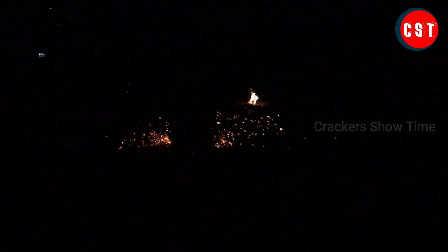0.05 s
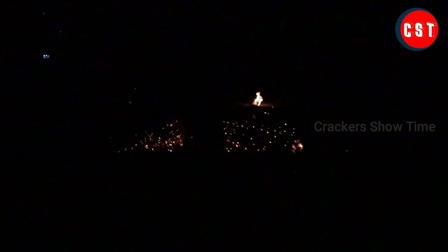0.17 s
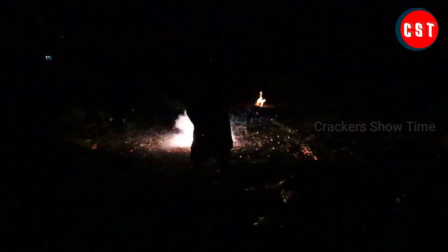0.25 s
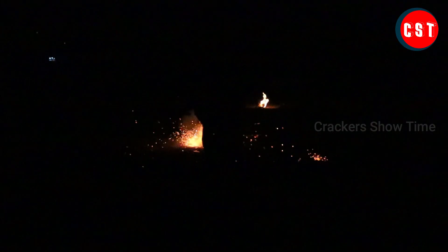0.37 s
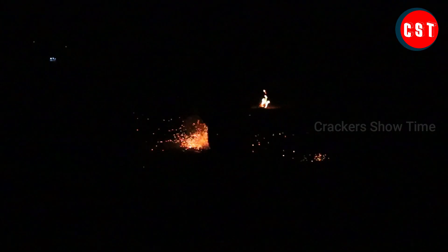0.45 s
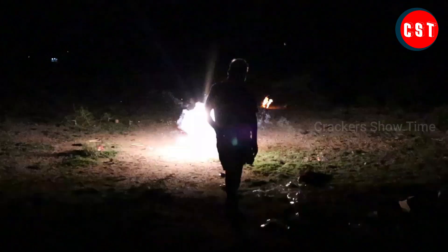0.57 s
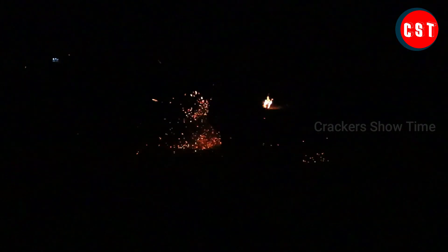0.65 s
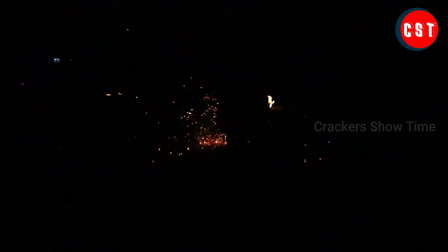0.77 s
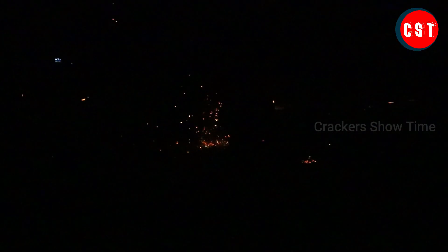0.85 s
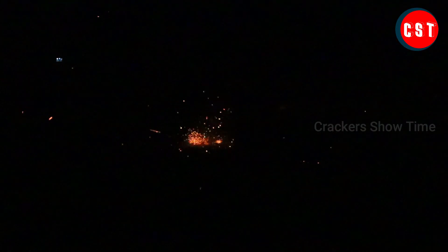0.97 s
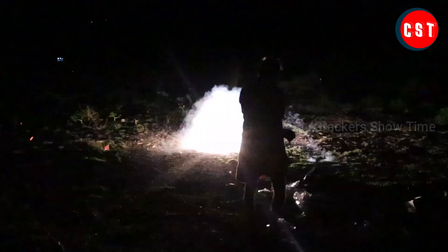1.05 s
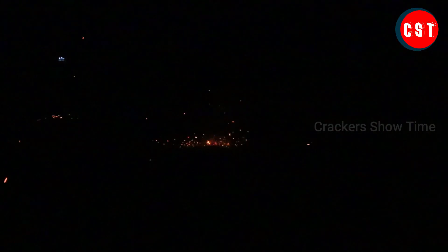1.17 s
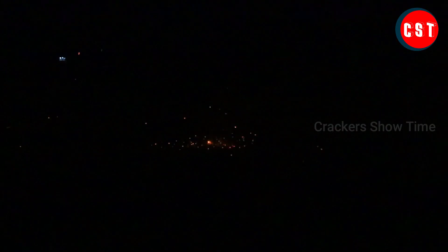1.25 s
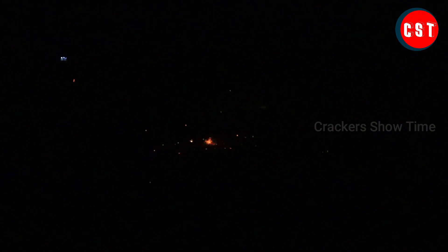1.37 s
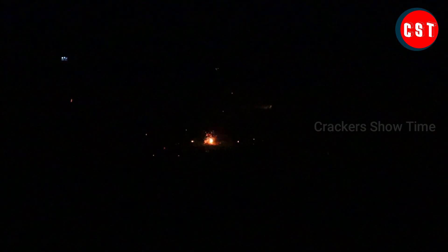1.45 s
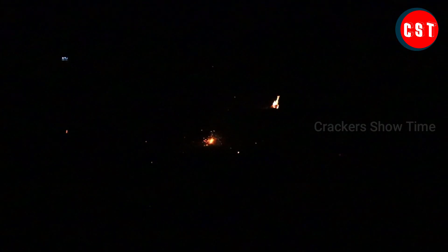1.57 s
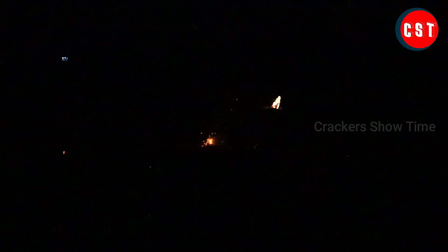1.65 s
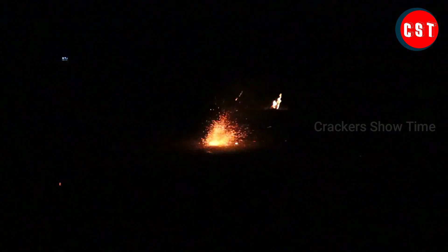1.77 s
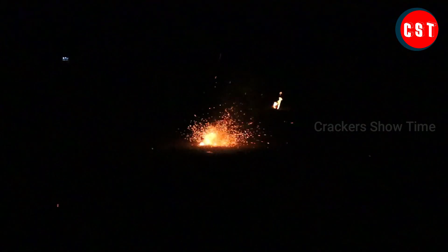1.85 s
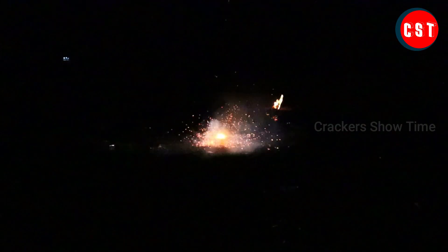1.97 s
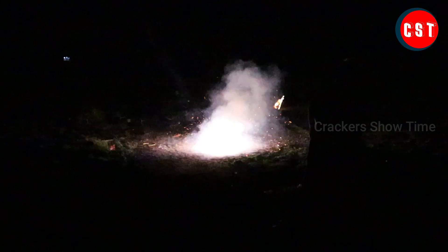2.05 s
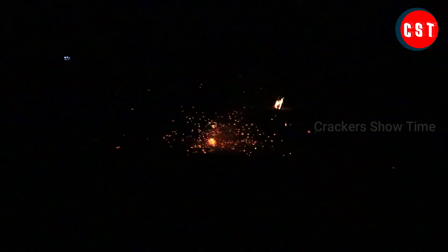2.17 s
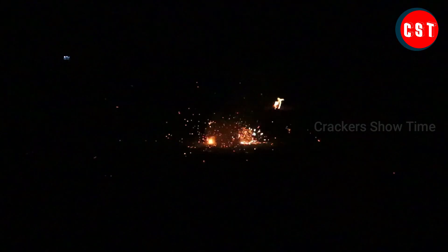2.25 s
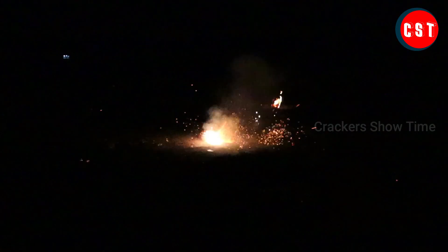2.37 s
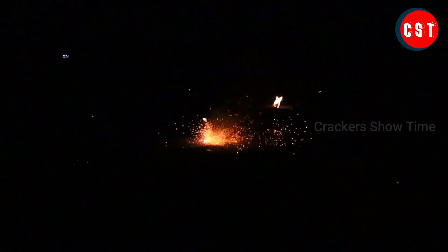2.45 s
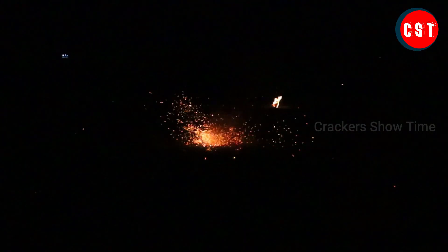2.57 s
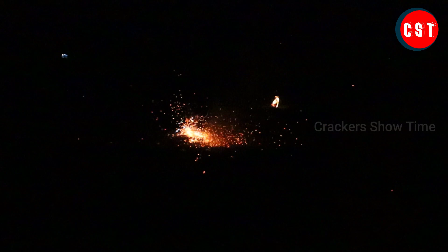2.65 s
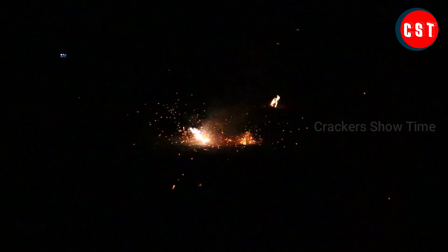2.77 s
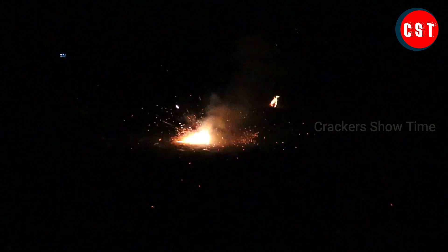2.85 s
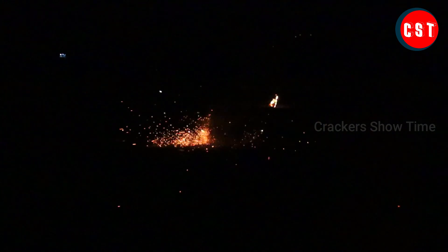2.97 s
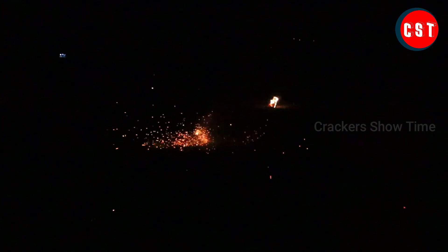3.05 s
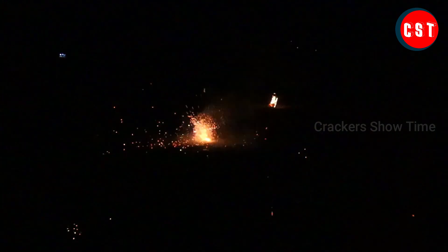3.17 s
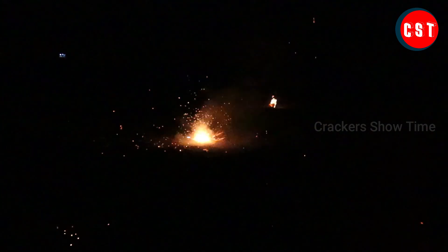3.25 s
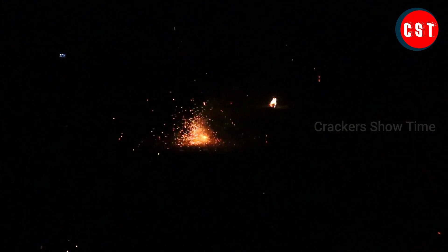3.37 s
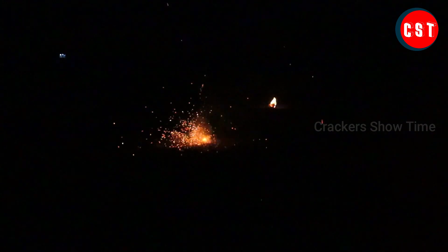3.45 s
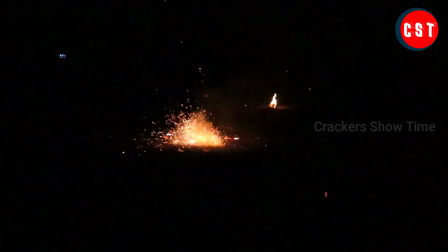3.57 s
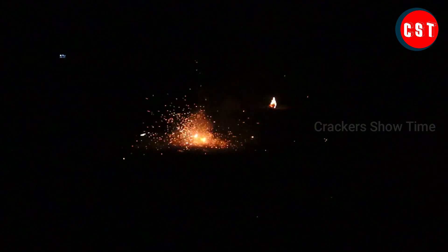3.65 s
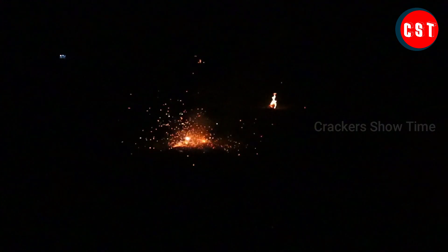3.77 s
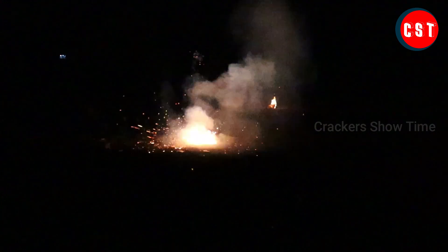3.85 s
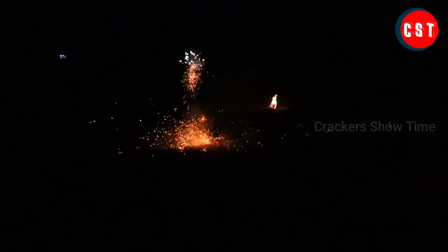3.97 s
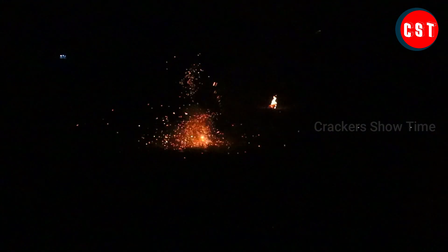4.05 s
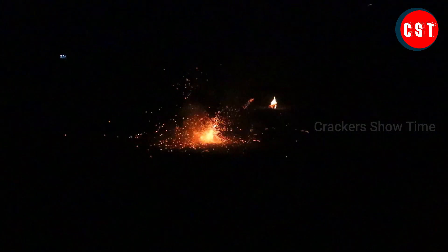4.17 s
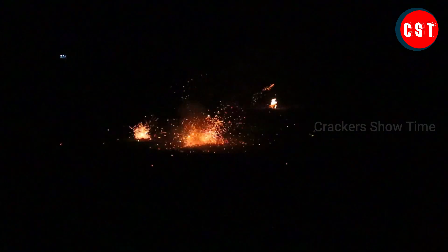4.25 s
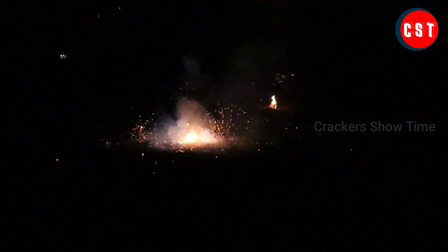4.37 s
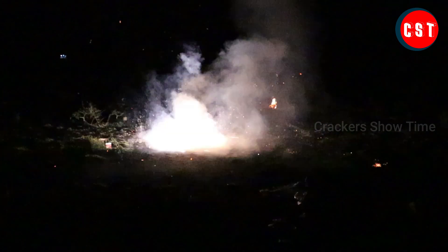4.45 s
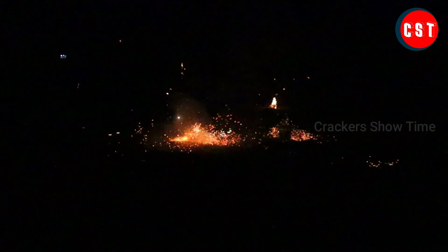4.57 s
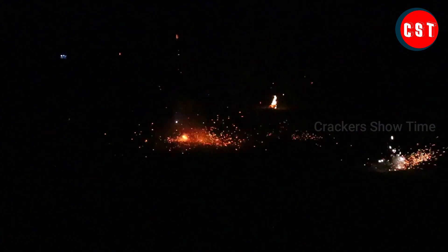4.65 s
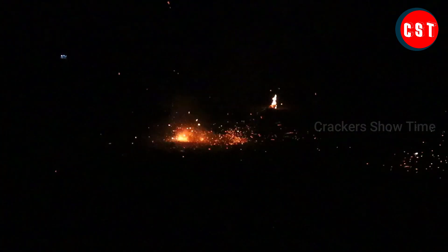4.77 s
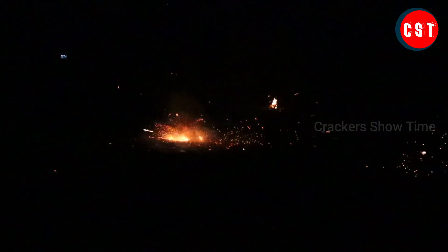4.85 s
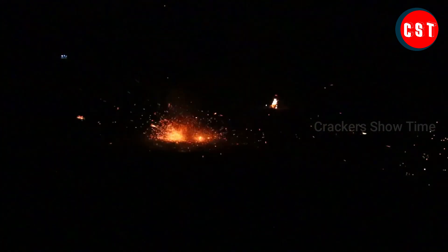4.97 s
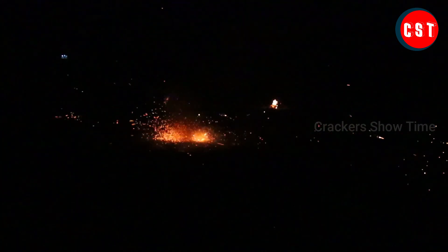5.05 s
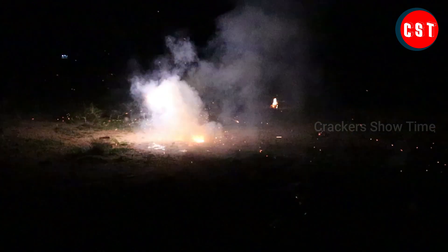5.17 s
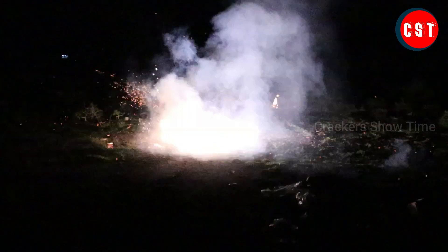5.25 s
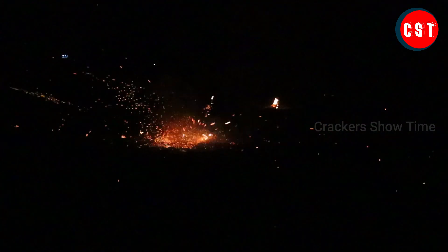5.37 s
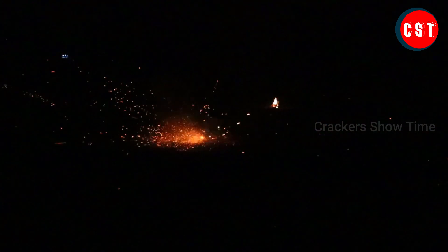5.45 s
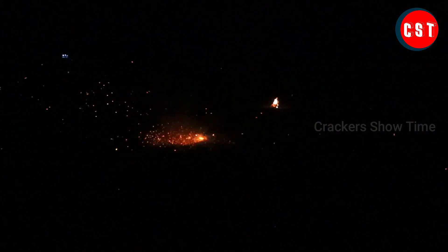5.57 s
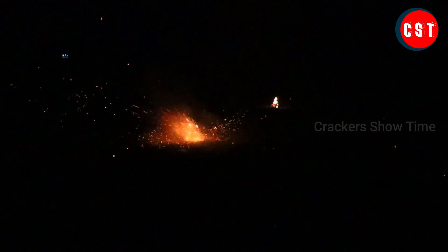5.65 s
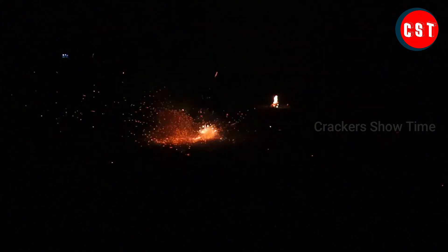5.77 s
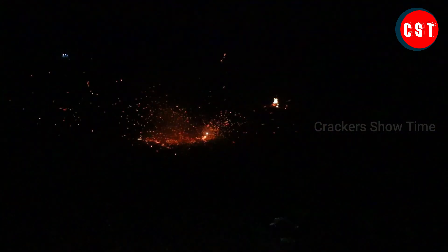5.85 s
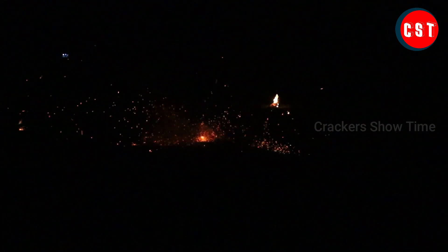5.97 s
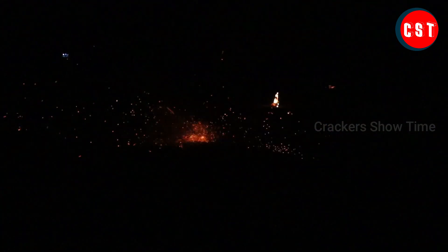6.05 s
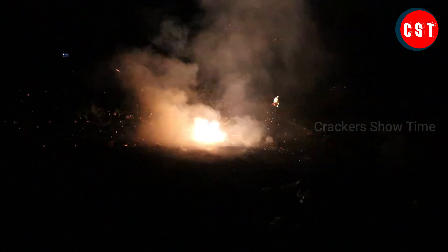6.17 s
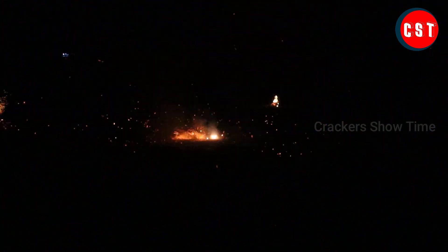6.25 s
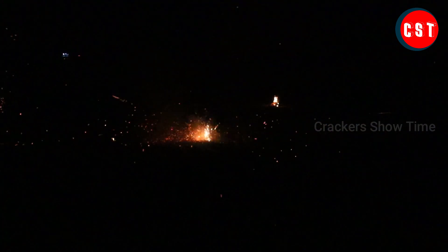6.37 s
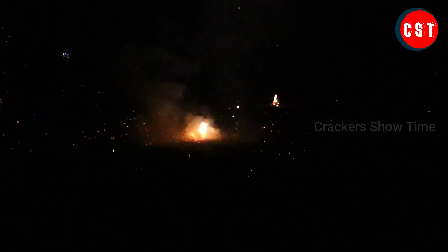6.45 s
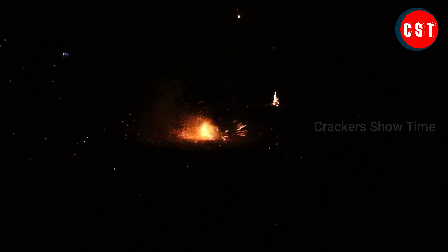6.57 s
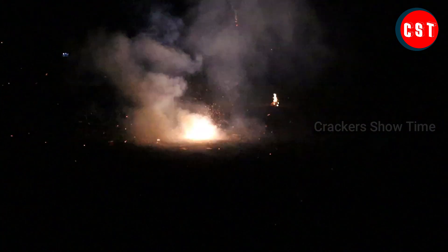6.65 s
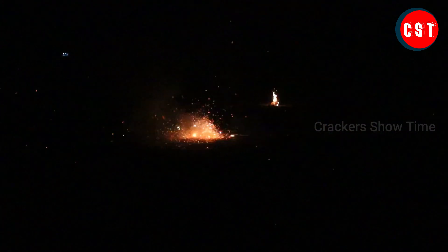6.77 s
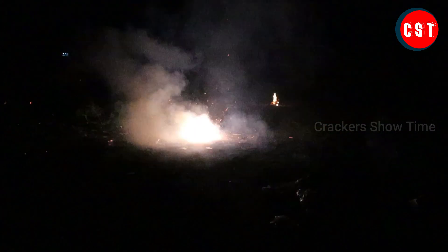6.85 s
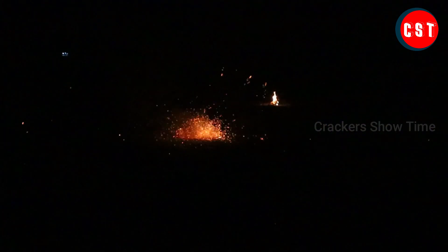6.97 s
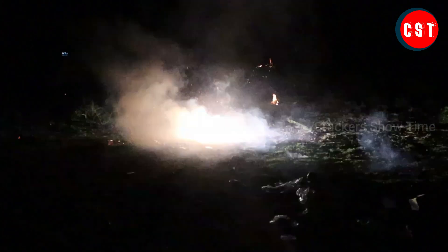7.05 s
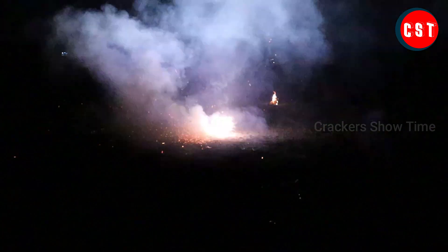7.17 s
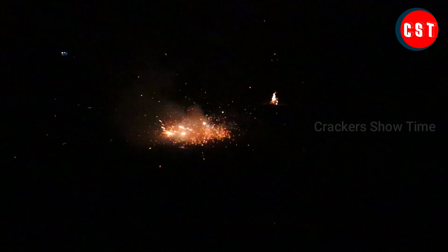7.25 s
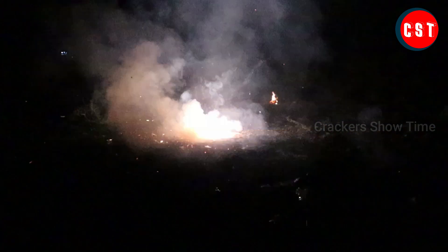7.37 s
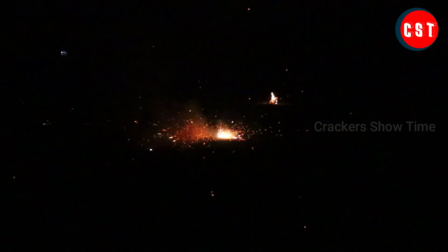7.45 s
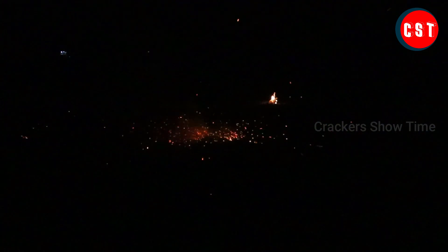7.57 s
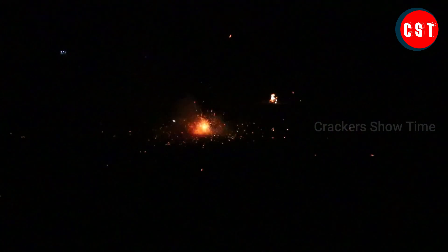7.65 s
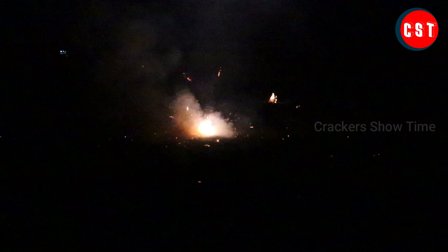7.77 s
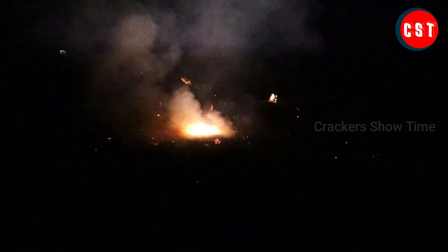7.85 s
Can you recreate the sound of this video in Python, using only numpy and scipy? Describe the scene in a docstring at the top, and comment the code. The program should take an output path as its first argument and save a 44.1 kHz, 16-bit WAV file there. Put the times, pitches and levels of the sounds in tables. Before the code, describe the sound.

At night on open ground, a firecracker string explodes a few metres from a hand-held stereo recorder. Echo from earlier blasts already hangs at the start. From 0.1 to 0.55 seconds come the most violent bangs, clipped cracks with thick low thumps, the hardest near 0.44. Four more spaced bangs follow between 0.75 and 1.24. The wash then fades through a pause until about 1.88, with faint, very high cricket chirps around 1.6 to 1.85. Bangs return, clustering at 2.4 to 3.0, then loosen, with lighter snaps near 3.7. From 4 seconds the chain grows dense and irregular, several to over ten pops a second, brighter, drier and with little bass, crowding most around 5.4 and 7.0 to 7.3. Slaps and wide noisy reverberation fill the gaps, ducked by overload after big blasts. It thins slightly near 7.6 but continues to the end, near 7.9.

```python
"""Firecracker string at night

A string of firecrackers burns on open ground, a few metres from a hand-held stereo recorder.
Each bang is an N-shaped shock with a ground bounce, a spit of bright noise and a thump of ringing low modes.
Walls and trees send back slaps and a long wash, built from bursts and bands of dying noise.
The bangs overload the recorder, whose limiter ducks the wash after each one; crickets chirp in a pause."""
import sys
import numpy as np
from scipy import signal
from scipy.fft import rfft, irfft
from scipy.io import wavfile
from scipy.ndimage import minimum_filter1d

SR = 44100
rng = np.random.default_rng(int(sys.argv[2]) if len(sys.argv) > 2 else 0)


def wav_record(signal):
    """Record a signal, one row per channel, as 16-bit PCM in the file named by sys.argv[1]."""
    frames = np.transpose(np.atleast_2d(signal))
    bounded = np.clip(frames, -1, 1)
    # unit amplitude maps onto the largest positive 16-bit level
    quanta = np.round(bounded * 32767).astype(np.int16)
    wavfile.write(sys.argv[1], SR, quanta)


N = 348831

# The bangs of the string. Each row: start in seconds, relative blast sent to the surroundings in dB,
# relative crack straight to the recorder in dB, relative thump in dB, ground bounce delay in ms,
# shock length in ms.
BANG_ROWS = [(0.0952, 19, 19, 11, 0.43, 0.3), (0.1397, 6.5, 17.0, 11, 0.47, 0.29),
             (0.3758, 14.5, 15, 9.5, 0.34, 0.26), (0.4358, 20.5, 29, 15.5, 0.35, 0.3),
             (0.4528, 18.5, 17.5, 15.5, 0.71, 0.3), (0.5286, 23, 21, 10.5, 0.14, 0.35),
             (0.7463, 4, 8.5, 1, 0.62, 0.28), (0.8579, 18.5, 10.5, 11.5, 0.58, 0.3),
             (1.1063, 11, 7, 3.5, 0.37, 0.46), (1.2361, 18.5, 12, 13, 0.88, 0.18),
             (1.878, 4.5, 6, 7, 0.16, 0.27), (1.9672, 12.0, 10.0, 6.5, 1.07, 0.42),
             (2.1606, 0, -1.5, -4, 1.9, 0.46), (2.229, 15, 12, 2, 0.56, 0.23),
             (2.3815, 9.5, 6.5, 3, 0.42, 0.29), (2.4784, 3.5, 10.5, -1, 0.3, 0.12),
             (2.4799, 3, 13.5, -8, 0.18, 0.19), (2.4847, -8, 7, -5.5, 1.2, 0.42),
             (2.5393, 4.5, 7, 3.5, 0.72, 0.34), (2.6467, 10.5, 3, 0.5, 0.36, 0.3),
             (2.6577, 9, 10, 2, 0.37, 0.29), (2.6689, 5, 4.5, -1, 0.4, 0.21),
             (2.8054, 14.5, 11.5, 2.0, 0.31, 0.31), (2.8163, 10, 6.5, 0.5, 0.7, 0.28),
             (2.9146, 7.5, 4.5, -4.5, 0.35, 0.29), (2.9983, 5.5, 2.5, -1, 0.62, 0.26),
             (3.0209, -18, 5, -3, 0.29, 0.21), (3.2761, 8.5, 3.5, -10, 0.32, 0.32),
             (3.4144, 1, 4.0, -2, 0.68, 0.28), (3.5685, 3, 2, -7.5, 0.49, 0.26),
             (3.6697, -49, -11.5, -21.0, 0.33, 0.33), (3.711, -44, -5, -5, 0.69, 0.3),
             (3.7191, -22.0, 4, -6, 1.39, 0.34), (3.9713, -8.5, 0, -8, 0.36, 0.23),
             (3.9906, 4.5, 6.0, -2.5, 0.63, 0.28), (4.0278, 5.5, -2.5, 1.5, 0.53, 0.27),
             (4.0962, 2, 1, -5.5, 0.62, 0.32), (4.1842, 2.0, 1.0, -18, 0.34, 0.3),
             (4.2466, 1.0, -2.5, -13, 0.66, 0.32), (4.3975, -0.5, -2.5, -19, 0.41, 0.3),
             (4.4123, -13.0, -8.5, -31, 0.27, 0.7), (4.4924, -19, -6, -12.5, 0.33, 0.3),
             (4.5769, -4.0, -1.5, -18.5, 0.62, 0.3), (4.6332, -4.5, -4, -9.5, 0.67, 0.34),
             (4.6683, -5.5, -1, -13.0, 0.48, 0.28), (4.6841, 4, 0, -4, 0.32, 0.36),
             (4.7359, -11, -0.5, -8, 0.36, 0.34), (4.7823, -10, 3.0, -7.5, 0.3, 0.19),
             (4.8715, -7, -7, -15, 0.37, 0.33), (4.8801, -12.5, -11, -9.5, 0.98, 0.36),
             (5.0003, -11, -5.5, -8, 0.37, 0.31), (5.068, -3.5, -5.5, -10.5, 0.56, 0.25),
             (5.0701, -6, -5, -10.5, 0.66, 0.33), (5.1063, 0.5, -4, -4.5, 0.26, 0.22),
             (5.2109, -13, -9, -7.5, 0.79, 0.45), (5.2556, -6, -3, -3.5, 0.24, 0.29),
             (5.2763, -4.5, -1.5, -5, 0.38, 0.27), (5.3507, -11, -4, -15.5, 0.71, 0.22),
             (5.398, -13, -9, -13.5, 1.14, 0.36), (5.4131, -19, -13.5, -21.0, 0.75, 0.26),
             (5.4212, -8, -3.5, -4.5, 0.3, 0.43), (5.4317, -7.5, -5, -16.5, 0.38, 0.26),
             (5.5012, -15, -3.5, -10.0, 0.27, 0.35), (5.5025, -17, -2, -14, 0.7, 0.34),
             (5.507, -13.0, -4.5, -12, 0.42, 0.23), (5.57, -19, -5.5, -5.5, 0.7, 0.33),
             (5.7704, -5, -3.5, -10.5, 0.68, 0.31), (5.7918, -17, -20.5, -19.5, 0.22, 0.45),
             (5.8624, -2.5, -7.0, -12, 0.49, 0.27), (5.9084, -8.0, -5, -19, 0.4, 0.35),
             (5.937, -18, -10.5, -16.5, 0.67, 0.32), (6.0441, -5.0, 1, -8.5, 0.36, 0.36),
             (6.0527, -27.0, -4, -16, 0.75, 0.32), (6.1941, -5.5, -0.5, -12, 0.37, 0.24),
             (6.398, -14, -7.5, -15.5, 0.74, 0.23), (6.4094, -15, -7, -49, 0.56, 0.52),
             (6.4453, -6, -1.0, -7.0, 0.72, 0.27), (6.5243, -10.5, -6.5, -18, 0.39, 0.3),
             (6.6241, -14, -8, -13, 0.36, 0.32), (6.7237, -13.5, -3.5, -8.0, 0.62, 0.37),
             (6.8273, 2, 1, -19, 0.5, 0.3), (6.9106, -10, -0.5, -8.5, 0.28, 0.35),
             (6.9265, -3.5, -0.5, -11.0, 0.4, 0.31), (6.9779, -2.5, 0.5, -8, 0.35, 0.32),
             (7.0165, 0.5, -1, -10.5, 0.47, 0.3), (7.0335, -6, -2, -18, 0.32, 0.26),
             (7.0428, -9, 3.5, -5.5, 0.3, 0.29), (7.1683, -2, -1, -16, 0.36, 0.36),
             (7.1707, -9.0, -3.5, -14, 0.35, 0.34), (7.2161, -15, -5.5, -15, 0.48, 0.35),
             (7.2188, -5.0, -2, -14, 0.68, 0.54), (7.2295, -7, -7, -15, 0.28, 0.16),
             (7.2381, -9, 0.5, -9, 0.36, 0.19), (7.2587, -1, -4, -16, 1.6, 0.21),
             (7.3474, 2.5, 1, -13.5, 0.42, 0.33), (7.4146, -26.0, -8, -12.5, 0.78, 0.48),
             (7.4807, -15, -7, -21, 0.42, 0.36), (7.5502, -6.5, -2.5, -11, 0.67, 0.4),
             (7.578, -7, -3.5, -14.5, 0.51, 0.34), (7.6054, -19.0, -7.5, -19, 0.72, 0.46),
             (7.7811, -10.5, -5.5, -22, 0.36, 0.32), (7.8591, -17.0, -10.5, -37, 0.43, 0.38),
             (7.8904, -6, -11, -14, 0.39, 0.38)]
# Bangs just before the start, whose wash hangs on. Each row: time in seconds, relative blast in dB.
EARLIER_BANGS = [(-.45, -14), (-.3, 25.5)]
# Low modes struck by each blast. Each row: frequency in Hz, mean level in dB, t60 in seconds.
THUMP_MODES = [(57.5, -1.5, 0.018), (134, -17.5, 0.012), (278.5, -7, 0.017), (417, -9, 0.019),
               (572, -5.5, 0.019), (696, -13, 0.024)]
# Delays of the slaps from walls, in ms.
SLAP_DELAYS_MS = [6.5, 12, 28, 68, 72, 190, 334.5, 383.5, 484, 583.5]
# The same slaps, in the same order. Each row: left in dB, right in dB, centre in Hz, smear in ms.
SLAP_COLOURS = [(-10, -15.5, 163, 3.8), (-21, -27, 156, 3.6), (-25, -27.5, 110, 5.6),
                (-24.5, -24.5, 180, 14), (-12, -28.5, 4240, 33.3), (-22.5, -27, 2730, 12.3),
                (-49, -57, 1000, 1.8), (-37.5, -42, 670, 3.7), (-38, -43, 490, 0.5), (-54, -54, 600, 0.77)]
# Flat walls that return one clean click. Each row: delay in ms, relative left in dB, relative right in dB.
FLAT_WALLS = [(70.7, -11, -21), (92.6, -10, -21)]
# Wash from trees and far walls. Each row: frequency in Hz, relative level in dB per Hz, t60 in seconds,
# left-right likeness (correlation, -1 to 1), left minus right in dB.
WASH_BANDS = [(50, -17, 9.7, 1, -1), (138, -5, 5.4, 1, 6), (330, 4, 2, 1, 2), (820, -10, 21.8, 0.64, 3.5),
              (1680, 2.5, 5.7, -0.85, 3), (3560, 6.5, 1.6, 0.22, 1.5), (6300, 9, 2.12, 0.06, 9),
              (11400, 15, 0.98, -0.55, 4.5), (16000, 13, 1.66, -0.0038, 0.5)]
# Chirps of two crickets. Each row: start in seconds, left level in dB, starting pitch in Hz.
CRICKET_CHIRPS = [(1.612, -55, 9450), (1.70, -54, 6850), (1.782, -52, 9450), (1.80, -54, 7000),
                  (1.828, -52, 9450), (1.833, -53, 6950)]
# Colour of the two microphones. Each row: frequency in Hz, left gain in dB, right gain in dB.
MIC_COLOUR = [(29, -36, -54), (109, -9, -8.5), (266, -3, -1), (604, 1.5, 5), (1210, 4, 1.5),
              (2110, 2.5, 4.5), (5400, 8, 7.5), (9260, 5.5, 4.5), (12850, -3.5, -3.5), (18100, 6.5, 7)]
# Deep bass, which swings and ends far lower. Each row: time in seconds, gain in dB.
DEEP_BASS = [(0, 14), (1, -12.5), (2, 8.5), (3, -13), (4.5, -7), (7.91, -25)]

# night air: drive of its noise before the dulling
NIGHT_DRIVE_DB = -65
# far wash: level, spread of its fine grain, spread of the uneven lumps in each band
WASH_DB, WASH_GRAIN_DB, WASH_ROLL_DB = -15.5, 1.5, 4
# bushes nearer than the walls return slightly less, ahead of the full wash
WASH_START_MS, EARLY_WASH_DB = 68, -2
FAR_SLAPS_PER_S, FAR_SLAP_DB, FAR_CUT_HZ, FAR_SMEAR_MS = 45, 19, 2500, 1.5
# cracks: left minus right, mean and spread; the right microphone hears them a little later
CRACK_LEFT_DB, CRACK_WANDER_DB, RIGHT_LAG_S = 3, 1.5, 60e-6
BOUNCE_DB, BOUNCE_SPREAD_DB = -5.5, 6
BODY_ECHO_MS, BODY_ECHO_DB, BODY_ECHO_SPREAD_DB = 1.64, -9.5, 2   # off the person holding the recorder
# spit: level, decay, lower edge, dB lost per dB of thump over crack
SPIT_DB, SPIT_MS, SPIT_HZ, MUFFLING = -17, 0.67, 4240, 0.49
EVEN_DB = 4   # a thump this far under its crack leaves the spit unchanged
# thumps: spread common to both sides, then spread of each side on its own
THUMP_SPREAD_DB, THUMP_SIDE_DB = 2, 4
RUMBLE_DB, RUMBLE_CUT_HZ = -4.5, 215   # the deeper part of the thumps rolls back with the wash
# the shock that reaches the walls is shorter and brighter: share of the usual length
SHOCK_MS, ECHO_PULSE = 0.34, 0.62
# scatter from the ground near by: level, t60, dulling, and a fainter share that lasts four times as long
NEAR_DB, NEAR_T60_S, NEAR_CUT_HZ, LINGER_DB = -11.5, 0.018, SR / 3, -6.5
SLAP_WIDTH, SLAP_GRAIN_DB = 4.2, 5   # band edges as a ratio to the centre; spread of the grains
MIRROR_HZ = 3800   # centre of the band that flat walls return
CHIRP_S, CHIRP_FALL = 0.025, 0.09   # length; share of the pitch lost by the end
# limiter: threshold re full scale, share of the excess taken off, attack, hold, recovery in dB per second
LIMIT_DB, LIMIT_RATIO, ATTACK_MS, HOLD_MS, RELEASE_DB_S = 4, 0.8, 2.05, 53, 142.5
OVERLOAD = 0.91   # clipping point as a share of full scale
HISS_DB = -73   # the recorder's own noise, which the limiter does not duck
BASS_HZ, CUTOFF_HZ = 148, 16100   # upper edge of the deep bass; top cut, 60 dB down from here


def amp(db):
    """Decibels to amplitude."""
    return 10 ** (np.asarray(db) / 20)


def at_hz(table, column, hz):
    """Reads a table column at any frequency, straight lines over log frequency."""
    rows = np.array(table)
    return np.interp(np.log(np.maximum(hz, 1)), np.log(rows[:, 0]), rows[:, column])


def fold(x, response):
    """Convolution, cut to the length of x."""
    return signal.fftconvolve(x, response, axes=-1)[..., :x.shape[-1]]


def butter_filter(x, order, hz, kind="low"):
    """Butterworth filter along time."""
    return signal.lfilter(*signal.butter(order, hz, kind, fs=SR), x)


def partly_shared_noise(size):
    """Noise common to both microphones, plus half as much that is each side's own."""
    return rng.standard_normal(size) + 0.5 * rng.standard_normal((2, size))


def night_air():
    """Dull, steady noise of the open air, from one-pole filtered white noise."""
    return amp(NIGHT_DRIVE_DB) * signal.lfilter([1], [1, -0.92], rng.standard_normal((2, N)))


def far_wash(size):
    """Response of the far surroundings: half-octave noise bands dying at their own rates, with far slaps."""
    t = np.arange(size) / SR
    edges = 40 * 2 ** np.arange(0, 9.2, 0.5)
    opposite = np.array([[1], [-1]])
    white = rng.standard_normal((2, 2, size))
    grain = amp(WASH_GRAIN_DB * np.repeat(rng.standard_normal(size // 96 + 1), 96)[:size])
    hits = rng.random(size) * (rng.random(size) < FAR_SLAPS_PER_S / SR)
    far = fold(hits, np.exp(-t[:512] * 1000 / FAR_SMEAR_MS))
    out = 0
    for k, (low, high) in enumerate(zip(edges, edges[1:])):
        band = signal.butter(2, [low, high], "band", fs=SR, output="sos")
        mid, side = signal.sosfilt(band, white[k % 2])
        centre = np.sqrt(low * high)
        db, t60, alike, pan_db = [at_hz(WASH_BANDS, column, centre) for column in (1, 2, 3, 4)]
        alike = np.clip(alike, -1, 1)
        pair = np.sqrt(1 + alike) * mid + np.sqrt(1 - alike) * side * opposite
        # far slaps come back dull
        pair = pair * (1 + amp(FAR_SLAP_DB) * far / (1 + (high / FAR_CUT_HZ) ** 2))
        knots = t[::512]
        roll_db = WASH_ROLL_DB * np.interp(t, knots, rng.standard_normal(len(knots)))
        out = out + pair * amp(db + roll_db - 60 * t / t60 + pan_db / 2 * opposite)
    out = out * grain * np.where(t > WASH_START_MS / 1000, 1, amp(EARLY_WASH_DB))
    return amp(WASH_DB) * out / np.sqrt(np.sum(out ** 2) / 2)


def shock(t, length_s):
    """N-shaped wave: a jump up, a ramp through zero into suction, a quick return."""
    u = np.maximum(t / length_s, 0)
    return np.clip(t * SR, 0, 1) * (1 - u * 2) * np.exp(-u ** 4 * 0.53)


def direct_crack(t, lag, length_s, bounce_s, bounce_db, body_db):
    """The shock straight to one microphone, then its ground bounce and a longer echo off the body."""
    wave = shock(t - lag, length_s)
    wave += amp(bounce_db) * shock(t - lag - bounce_s, length_s)
    wave += amp(body_db) * shock(t - lag - BODY_ECHO_MS / 1000, length_s * 1.474)
    return wave


def case_spits(t):
    """The paper case bursts with a spit of bright noise: one short high-passed burst per bang and side."""
    noise = rng.standard_normal((len(BANG_ROWS), 2, len(t)))
    return butter_filter(noise, 2, SPIT_HZ, "high") * amp(SPIT_DB) * np.exp(-t * 1000 / SPIT_MS)


def ring(clicks, hz, t60):
    """A unit click sets a sine of height 1 ringing."""
    r, w = amp(-60 / (t60 * SR)), 2 * np.pi * hz / SR
    return signal.lfilter([0, np.sin(w)], [1, -2 * r * np.cos(w), r * r], clicks + 1e-18)


def thump(strikes):
    """Damped low modes, each struck a little differently by every blast and on either side."""
    size = strikes.shape[1]
    out = 0
    for hz, db, t60 in THUMP_MODES:
        strike_db = db + THUMP_SPREAD_DB * rng.standard_normal(size)
        strike_db = strike_db + THUMP_SIDE_DB * rng.standard_normal((2, size))
        out = out + ring(strikes * amp(strike_db), hz, t60)
    return out


def near_scatter(t):
    """Short noise tail from the ground near by, with a fainter part that lingers."""
    near = butter_filter(partly_shared_noise(len(t)), 1, NEAR_CUT_HZ)
    dying = amp(-60 * t / NEAR_T60_S) + amp(LINGER_DB - 15 * t / NEAR_T60_S)
    return amp(NEAR_DB) * dying * near / np.sqrt(NEAR_T60_S * SR / 14)


def flat_wall_clicks(size):
    """Flat walls return single band-limited clicks."""
    clicks = np.zeros((2, size))
    for ms, left_db, right_db in FLAT_WALLS:
        clicks[:, round(ms / 1000 * SR)] = amp([left_db, right_db])
    return butter_filter(clicks, 1, [MIRROR_HZ / 2, MIRROR_HZ * 2], "band")


def slaps(size):
    """Response of near ground and walls: scatter, clicks, and clusters of tiny snaps off leaves and stones."""
    t = np.arange(size) / SR
    out = near_scatter(t)
    grain = amp(SLAP_GRAIN_DB * np.repeat(rng.standard_normal(size // 12 + 1), 12)[:size])
    for ms, (left_db, right_db, hz, smear_ms) in zip(SLAP_DELAYS_MS, SLAP_COLOURS):
        late = t * 1000 - ms
        burst = (late >= 0) * np.exp(-np.abs(late) / smear_ms) * grain * partly_shared_noise(size)
        burst = butter_filter(burst, 2, [hz / SLAP_WIDTH, hz * SLAP_WIDTH], "band")
        out += amp([[left_db], [right_db]]) * burst / np.sqrt(np.sum(burst ** 2) / 2)
    return out + flat_wall_clicks(size)


def surroundings(fired, boom):
    """Far wash of all blasts and their rumble, and the slaps from each firing place."""
    sent = fired.sum(0)
    sent[:boom.shape[1]] += amp(RUMBLE_DB) * butter_filter(boom.mean(0), 2, RUMBLE_CUT_HZ)
    back = fold(sent[None], far_wash(size=2 * SR))
    for place in fired:
        back += fold(place[None], slaps(size=SR * 2 // 3))
    return back


def bangs():
    """Direct shocks with bounce, body echo, spit and thump, then what the surroundings return."""
    lead = SR // 2   # room for the bangs before the start
    places = 4   # crackers jump about, so the slaps differ from bang to bang
    t = np.arange(256) / SR
    direct = np.zeros((2, N + 256))
    strikes = np.zeros((2, lead + N))
    fired = np.zeros((places, lead + N + 256))
    spits = case_spits(t)
    for s, db in EARLIER_BANGS:
        i = lead + round(s * SR)
        fired[0, i:i + 256] += amp(db) * shock(t, SHOCK_MS / 1000)
        strikes[:, i] = amp(db + 1.5)
    for k, (s, db, crack_db, thump_db, bounce_ms, shock_ms) in enumerate(BANG_ROWS):
        i = round(s * SR)
        body_chance, bounce_chance, pan_chance = rng.standard_normal(3)
        body_db = BODY_ECHO_DB + BODY_ECHO_SPREAD_DB * body_chance
        bounce_db = BOUNCE_DB + BOUNCE_SPREAD_DB * bounce_chance
        pan_db = CRACK_LEFT_DB + CRACK_WANDER_DB * pan_chance
        # muffled, thumping bangs spit less
        spit_gain = amp(-MUFFLING * (thump_db - crack_db + EVEN_DB))
        for side, lag in enumerate((0, RIGHT_LAG_S)):
            wave = direct_crack(t, lag, shock_ms / 1000, bounce_ms / 1000, bounce_db, body_db)
            level = amp(crack_db + pan_db * (1.5 - side))
            direct[side, i:i + 256] += level * (wave + spit_gain * spits[k, side])
        strikes[:, lead + i] = amp(thump_db + pan_db / 2 * np.array([1, -1]))
        fired[k % places, lead + i:lead + i + 256] += amp(db) * shock(t, SHOCK_MS / 1000 * ECHO_PULSE)
    boom = thump(strikes)
    back = surroundings(fired, boom)
    return direct[:, :N] + boom[:, lead:] + back[:, lead:lead + N]


def crickets():
    """Short sine whistles that swell, fade and bend down at the end."""
    out = np.zeros(N)
    u = np.linspace(0, 1, round(CHIRP_S * SR))
    for s, db, hz in CRICKET_CHIRPS:
        i = round(s * SR)
        phase = 2 * np.pi * np.cumsum(hz * (1 - CHIRP_FALL * u ** 4)) / SR
        out[i:i + len(u)] += amp(db) * np.sin(np.pi * u) * np.sin(phase)
    return out


def scene():
    """Night air, the bangs, and the crickets at half level on the right."""
    return night_air() + bangs() + crickets() * [[1], [0.5]]


def microphones(x):
    """Each side gets its colour as a causal (minimum-phase) filter."""
    hz = np.fft.rfftfreq(4096, 1 / SR)
    cepstrum = irfft(np.log(amp([at_hz(MIC_COLOUR, 1, hz), at_hz(MIC_COLOUR, 2, hz)])))
    cepstrum[:, 1:2048] *= 2   # folding the cepstrum forward makes the filter causal
    return fold(x, irfft(np.exp(rfft(cepstrum[:, :2049], 4096)))[:, :2048])


def limiter(x):
    """Ducks both sides together, too slowly for the shock front, then holds and recovers."""
    level_db = 20 * np.log10(np.abs(x).max(0) + 1e-9)
    over = np.maximum(level_db - LIMIT_DB, 0) * LIMIT_RATIO
    hold = round(HOLD_MS / 1000 * SR)
    held = -minimum_filter1d(-over, hold, origin=(hold - 1) // 2)
    slope = RELEASE_DB_S * np.arange(N) / SR
    released = np.maximum.accumulate(held + slope) - slope
    r = np.exp(-1000 / (ATTACK_MS * SR))
    return x * amp(-signal.lfilter([1 - r], [1, -r], released))


def swing_deep_bass(x):
    """Splits at the bass edge with two matched filter pairs and moves the lower part up and down."""
    def half(kind):
        sections = signal.butter(2, BASS_HZ, kind, fs=SR, output="sos")
        return signal.sosfilt(np.tile(sections, (2, 1)), x)
    return half("high") + half("low") * amp(np.interp(np.arange(N) / SR, *np.transpose(DEEP_BASS)))


def record(dry):
    """Microphones, limiter, clipping, hiss, swinging deep bass and a steep top cut."""
    x = np.clip(limiter(microphones(dry)), -OVERLOAD, OVERLOAD)
    x = x + amp(HISS_DB) * rng.standard_normal(x.shape)
    top_cut = signal.cheby2(12, 60, CUTOFF_HZ, fs=SR, output="sos")
    return np.clip(signal.sosfilt(top_cut, swing_deep_bass(x)), -1, 1)


dry = scene()
out = record(dry)
wav_record(out)
```